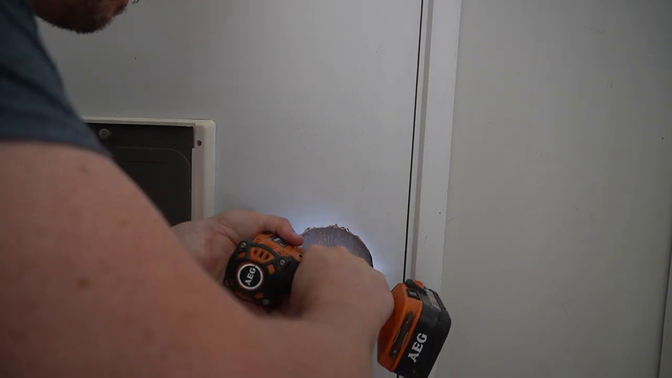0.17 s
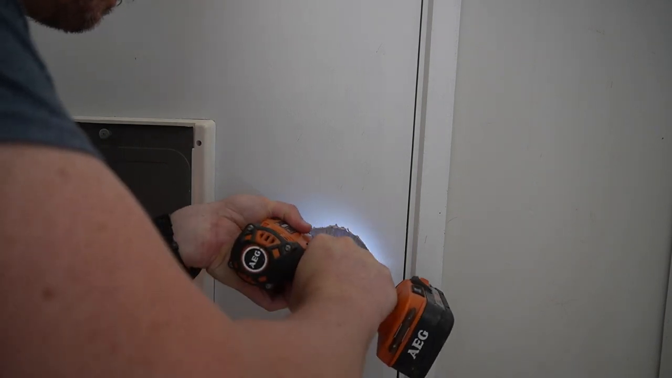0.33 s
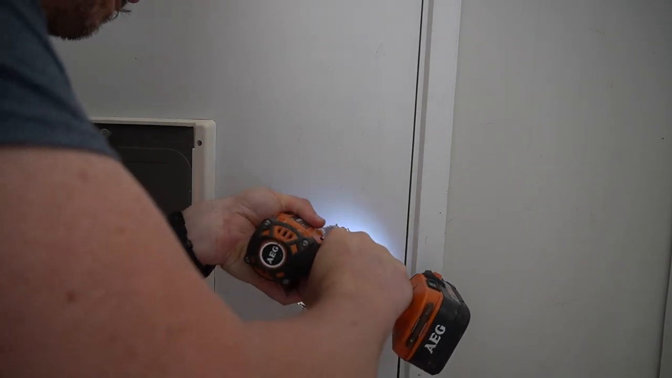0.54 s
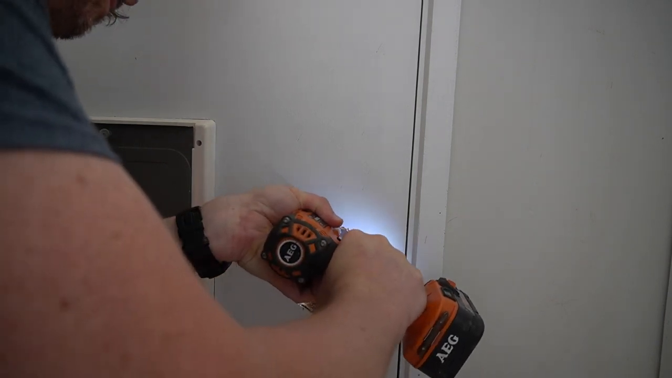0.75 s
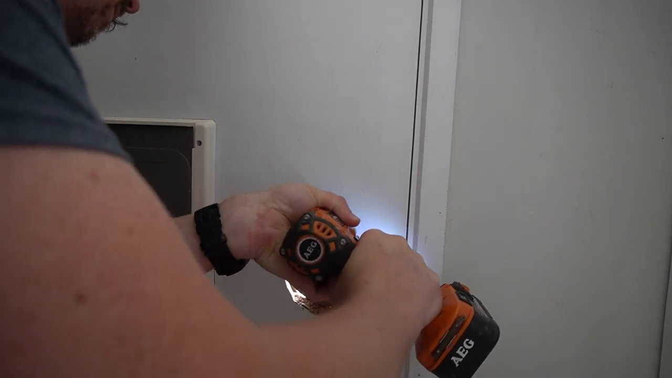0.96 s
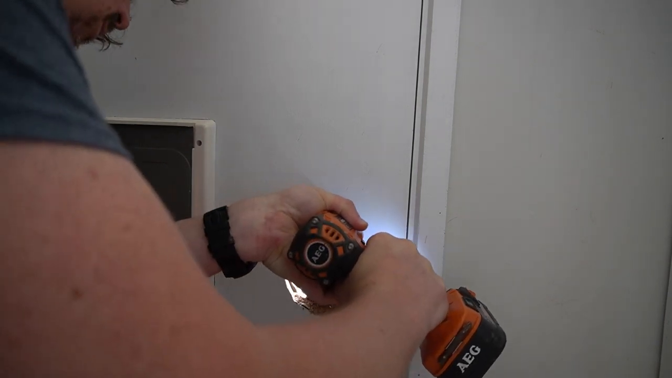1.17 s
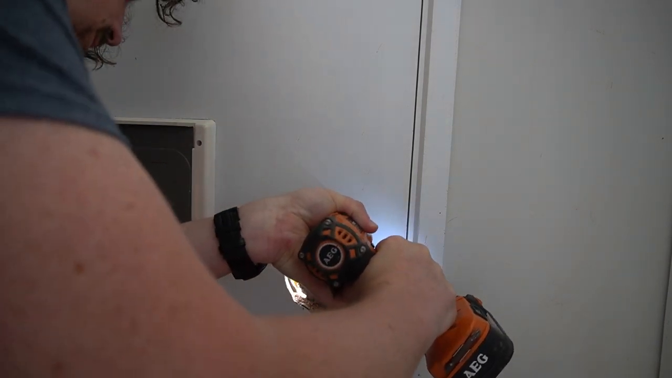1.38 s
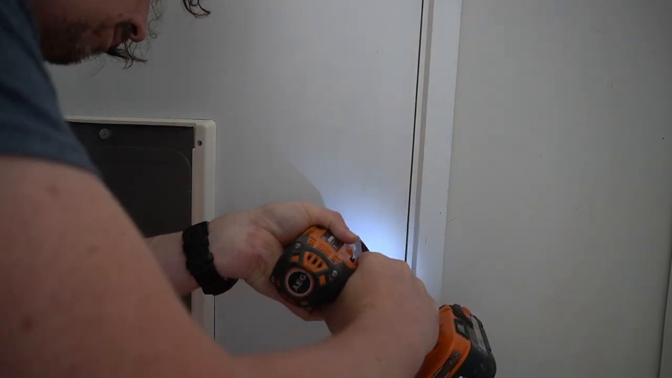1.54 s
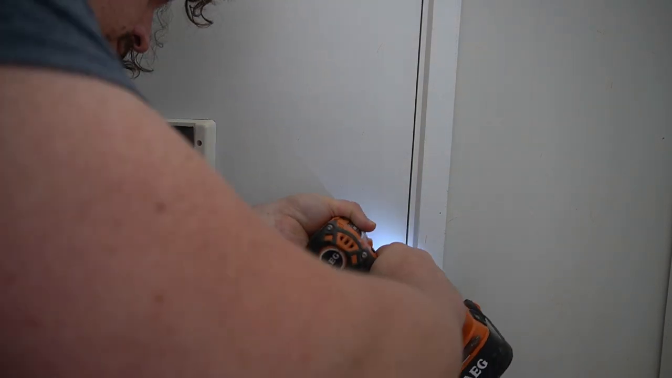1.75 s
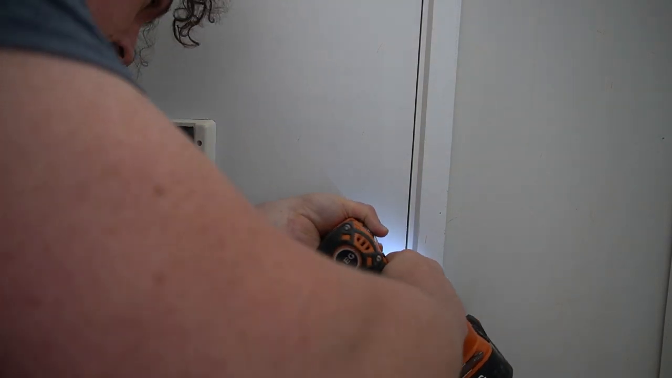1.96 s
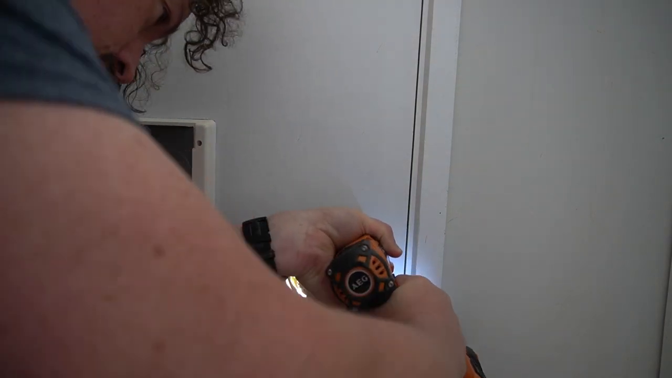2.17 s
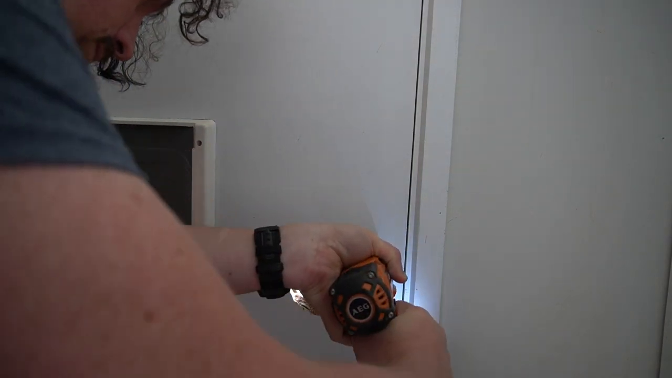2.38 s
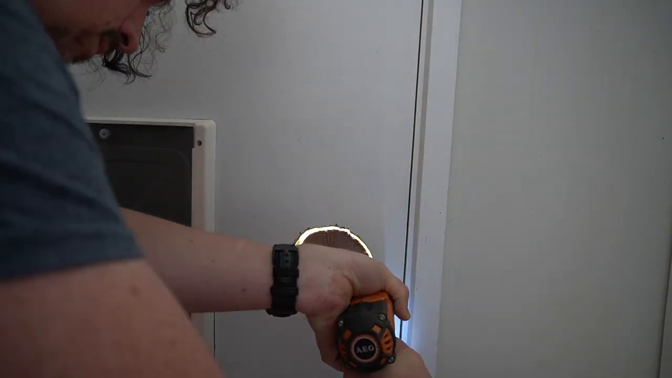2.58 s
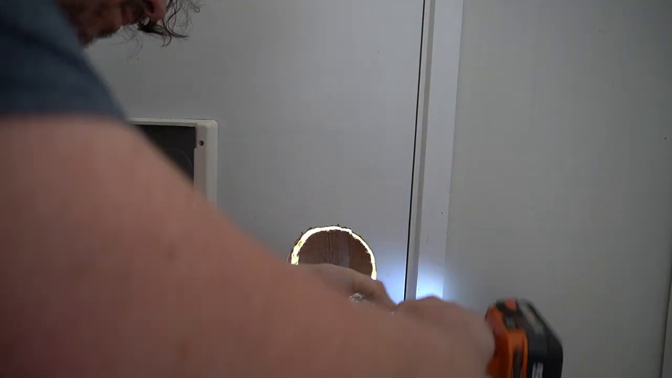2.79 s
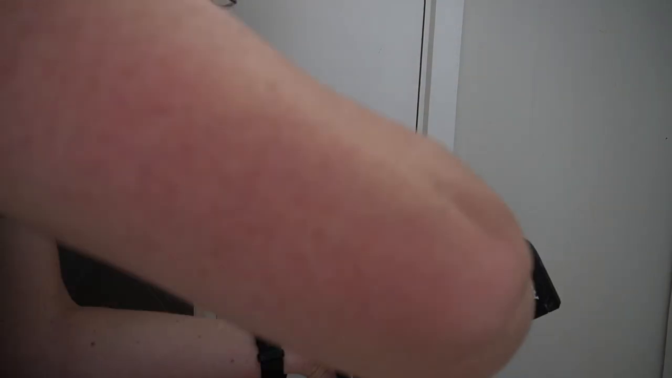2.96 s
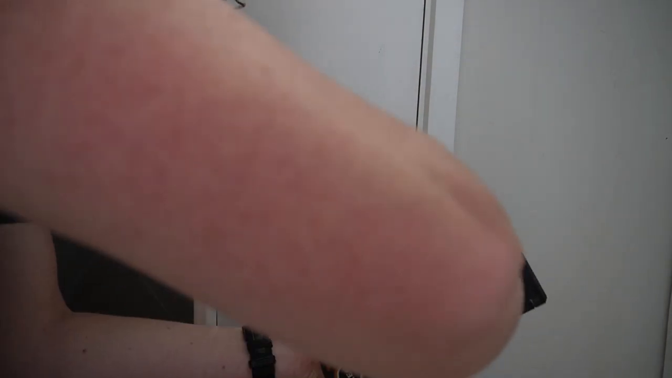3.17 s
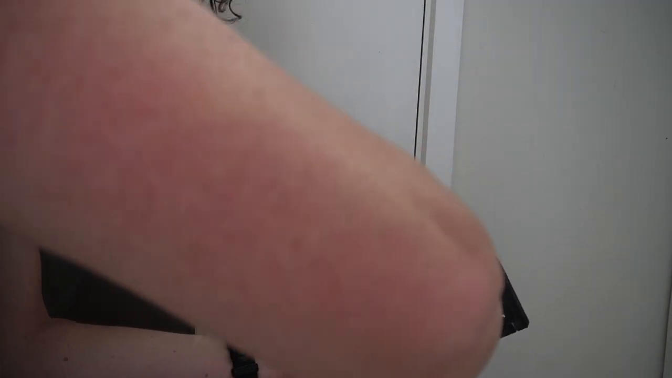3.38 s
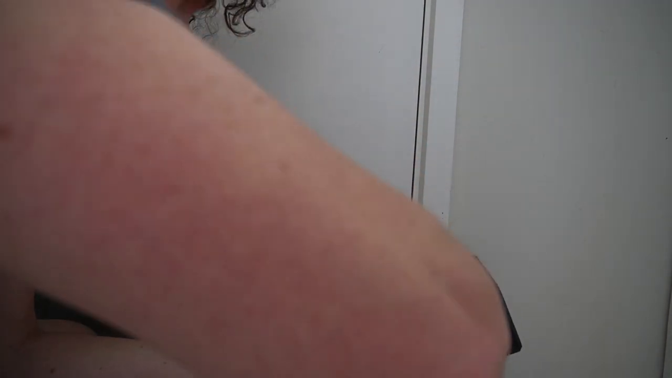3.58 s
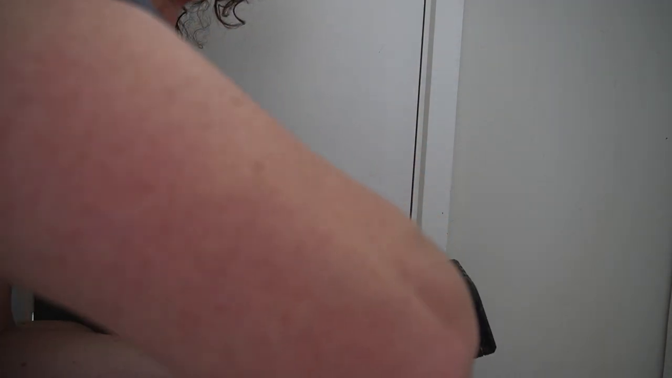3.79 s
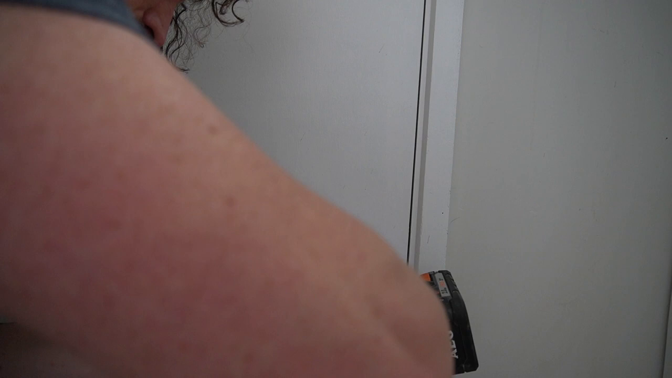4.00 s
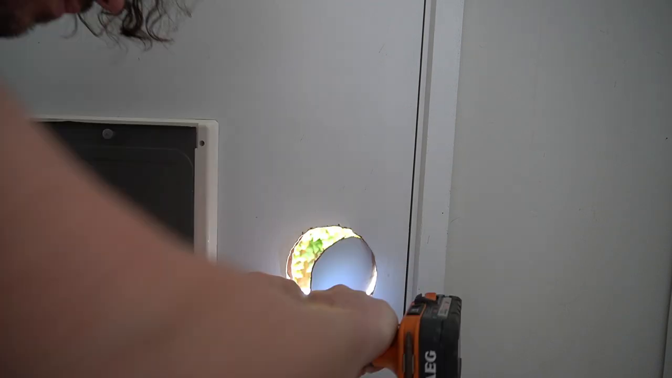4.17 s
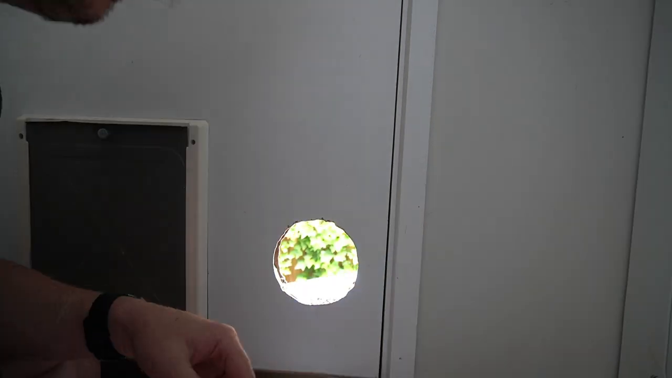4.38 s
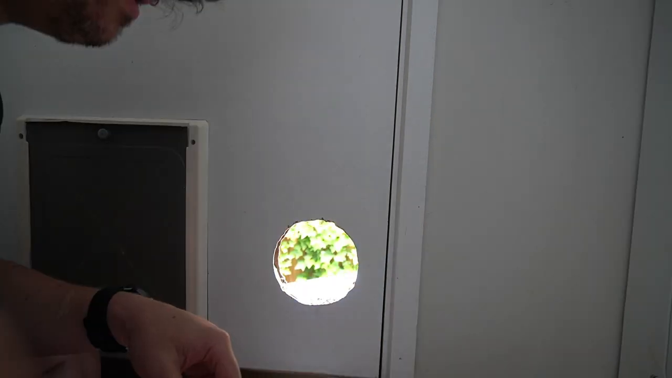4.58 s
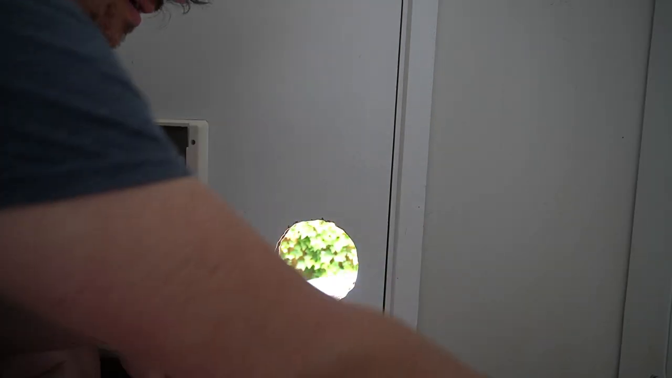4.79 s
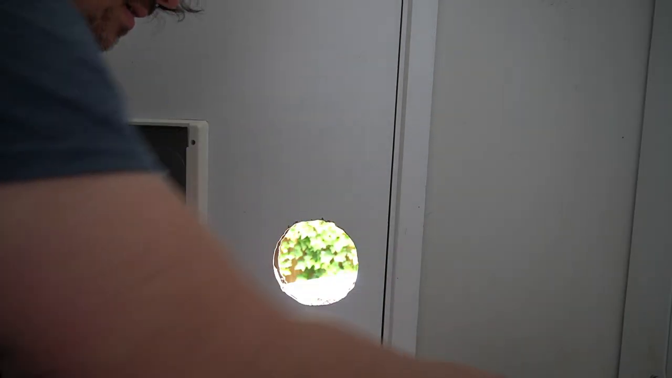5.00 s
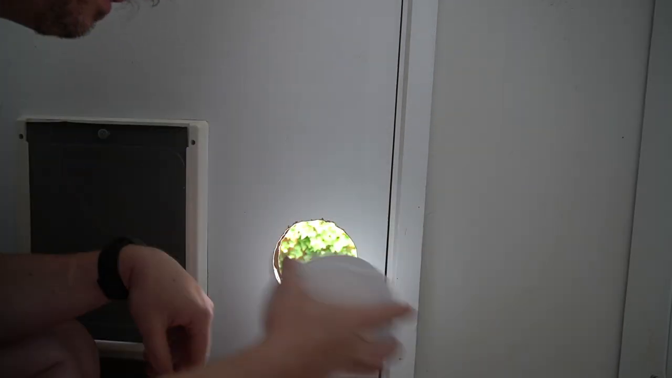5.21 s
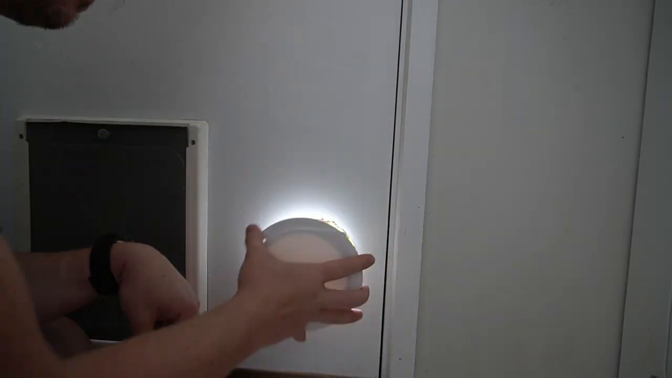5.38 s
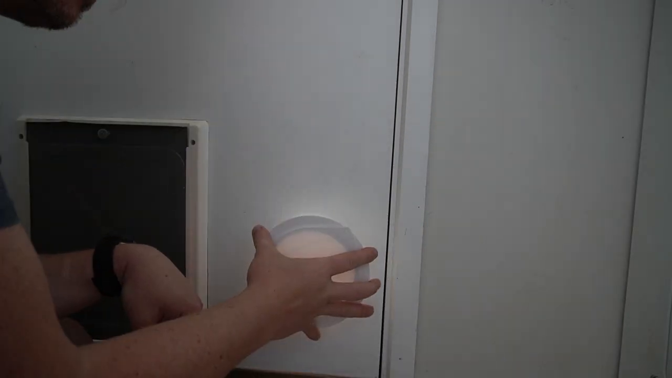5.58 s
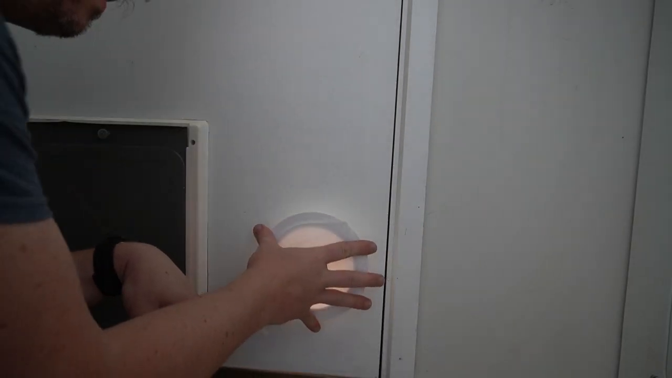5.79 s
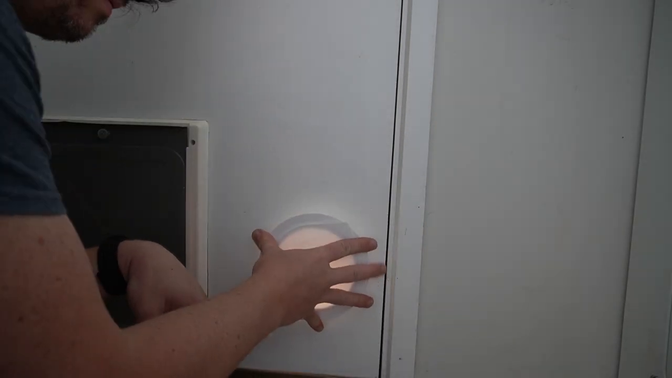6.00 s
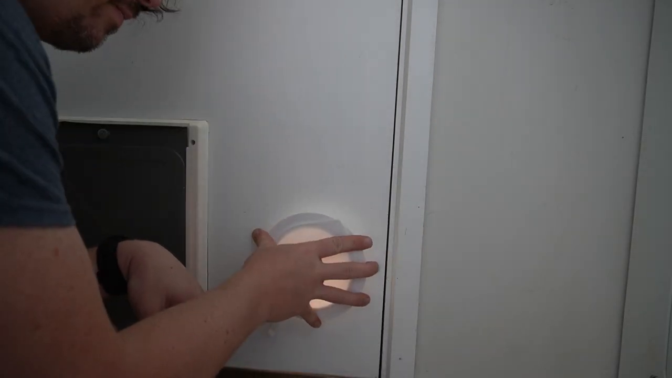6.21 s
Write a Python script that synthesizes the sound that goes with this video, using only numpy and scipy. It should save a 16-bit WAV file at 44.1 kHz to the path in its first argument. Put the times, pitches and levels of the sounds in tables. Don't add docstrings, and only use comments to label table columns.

```python
import sys
import numpy as np
from scipy import signal
from scipy.fft import rfft, irfft, next_fast_len
from scipy.io import wavfile
from scipy.ndimage import uniform_filter1d

SR = 44100
rng = np.random.default_rng(int(sys.argv[2]) if len(sys.argv) > 2 else 0)


def gain_from_db(level_db):
    decades = np.asarray(level_db, float) / 20
    return 10 ** decades


def transcribe(u):
    v = np.clip(np.atleast_2d(u).T, -1, 1)
    q = np.round(v * 32767).astype(np.int16)
    wavfile.write(sys.argv[1], SR, q)


N = 275625

# frequency in Hz, level in dB.
DOOR = [(115, -12), (161, -0.5), (280, -2.5), (382, -4.5), (517, -8), (657, 1.5), (732, 2), (840, -1),
        (969, -4), (1250, -18.5), (1604, -47)]


def evened(x):
    return x / np.sqrt(np.mean(x ** 2) + 1e-20)


def read(points, hz):
    f, value = np.transpose(points)
    return np.interp(np.log(hz + 1), np.log(f + 1), value)


def add(mix, s, sound):
    part = mix[max(round(s * SR), 0):][:len(sound)]
    part += sound[:len(part)]


def curves(rows):
    s, *columns = np.transpose(rows)
    t = np.arange(s[0], s[-1], 1 / SR)
    return t, [np.interp(t, s, c) for c in columns]


def lowpass(x, hz):
    return signal.lfilter(*signal.butter(N=2, Wn=2 * hz / SR), x)


def wander(size, hz):
    return evened(lowpass(rng.standard_normal(size + SR), hz)[SR:])


def coloured(x, points):
    size = next_fast_len(len(x))
    gain = gain_from_db(read(points, np.fft.rfftfreq(size, 1 / SR)))
    return evened(irfft(rfft(x, size) * gain, size)[:len(x)])


def grit(size, spread_db):
    grains = evened(uniform_filter1d(rng.standard_normal(size), size=40))
    return rng.standard_normal(size) * gain_from_db(spread_db * grains)


def resonate(x, hz, width):
    turn = np.exp(2j * np.pi * np.cumsum(hz * np.ones(len(x))) / SR)
    r = np.exp(-np.pi * width / SR)
    return 2 * (turn * signal.lfilter([1 - r], [1, -r], x / turn)).real


def peak(x, hz, width):
    return evened(resonate(resonate(x, hz, width), hz, width))


def faded(x, rise, fall):
    t = np.arange(len(x)) / SR
    return x * np.sin(np.pi / 2 * np.clip(np.minimum(t / rise, t[::-1] / fall), 0, 1)) ** 2


def drill(rows, speed, stance_db):
    # multiple of shaft speed, whine it follows (0-5), dB over it.
    orders = [(10.02, 0, -1), (20.02, 2, 0), (14.99, 1, 1), (30.0, 3, -2.5), (30.6, 5, -8), (39.96, 4, 2.5),
              (50.1, 5, -2), (11.0, 0, -9), (21.0, 2, -4), (19.0, 2, -9), (16.0, 1, -12), (33.0, 4, -6)]
    # mean in dB, swing in dB, loudest aim in degrees.
    lobes = [(-42.5, 5.5, 351), (-39.5, 4.5, 46), (-47.5, 1.5, 180), (-44.5, 8.5, 194), (-46.5, 1.5, 254),
             (-55, 4.5, 174)]
    # time in seconds, frequency in Hz.
    vent = [(0, 8200), (.9, 8500), (1.45, 9400), (1.7, 9000), (2.8, 8800), (2.9, 8500), (4.2, 8300)]
    # frequency in Hz, level in dB per Hz.
    cut_colour = [(1000, -39), (1300, -18.5), (1700, -20), (2200, -14), (2800, -9.5), (3500, -8),
                  (4300, -12.5), (5200, -11.5), (6000, -7.5), (9000, -10), (10500, -13), (12000, -19.5),
                  (13500, -21), (16000, -33)]
    # frequency in Hz, level in dB per Hz.
    rumble_colour = [(20, -25), (40, -13), (70, -6), (220, -13), (330, -13), (450, -9), (800, -10),
                     (1200, -11), (1600, -31), (2500, -55.5)]

    rise, fall = .024 * (rows[0][0] > 0), .024
    first, last = rows[0], rows[-1]
    held = [(first[0] - rise, *first[1:]), *rows, (last[0] + fall, *last[1:])]
    t, (cut_db, load, aim, shake_db) = curves(held)
    size = len(t)

    load = np.clip(load, .01, .99)
    boom_db = shake_db - 0.5 + 10 * np.log10(load)
    hum_db = shake_db - 1.5 + 10 * np.log10(1 - load)

    flutter = .0023 * wander(size, 14) + .0012 * wander(size, 60)
    shaft_hz = np.interp(t, *np.transpose(speed)) * (1 + flutter)
    turns = np.cumsum(shaft_hz) / SR
    whine_db = [db + swing_db * np.cos(np.radians(aim - facing)) for db, swing_db, facing in lobes]
    whine = np.zeros(size)
    for k, lead, db in orders:
        lead = int(lead)
        level_db = whine_db[lead] + stance_db[lead] + db + 3.5 + 2.6 * wander(size, 5)
        whine += gain_from_db(level_db) * np.cos(2 * np.pi * (k * turns + rng.random()))
    hum = gain_from_db(hum_db + 2.5) * (np.cos(2 * np.pi * turns) + 0.37 * np.cos(4 * np.pi * turns))

    bite = 1 + 0.11 * np.cos(2 * np.pi * turns)
    chips = grit(size, 1.0) * bite
    bright_hz = 7810 + 600 * load
    vent_hz = np.interp(t, *np.transpose(vent))
    hiss = coloured(chips, cut_colour) + 0.33 * peak(chips, bright_hz, 2700)
    hiss += 0.2 * peak(chips, vent_hz, 1300)
    hiss = gain_from_db(cut_db - 4.5 + 0.73 * wander(size, 14.5)) * evened(hiss)
    rumble_db = cut_db - 11 - 3.5 + 1.0 * wander(size, 9.1)
    rumble = gain_from_db(rumble_db) * coloured(grit(size, 1.1), rumble_colour)

    skin = rng.standard_normal(size)
    boom = gain_from_db(boom_db - 1.5) * evened(resonate(resonate(skin, 147.6, 44), 149.0, 44))
    boom += gain_from_db(-53.5 + 3.0 * (cut_db + 27.5)) * peak(skin, 290, 60)
    return t[0], faded(whine + hum + hiss + rumble + boom, rise + 1e-4, fall * 1.5)


def drill_bursts(mix):
    # time in seconds, cutting in dB, bite into the skin (0-1),
    # aim of the drill body in degrees, shaking of the door in dB.
    first = [(0.0, -25, 0.5, -3.5, -37.5), (0.208, -23.5, 0.6, -135.0, -43.6),
             (0.416, -27.0, 0.7, -186.0, -46.5), (0.624, -27.0, 0.6, -162.0, -49.5),
             (0.831, -27.5, 1, -195.0, -47.5), (1.039, -27.5, 0.64, -196.0, -42),
             (1.247, -26.5, 0.67, -190.0, -42), (1.455, -27, 0.72, -229.0, -40.5)]
    second = [(1.705, -27, 1.0, -200.0, -37.5), (1.86, -27, 0.99, -224.0, -37),
              (2.015, -27.5, 0.95, -236.0, -42), (2.17, -27.5, 0.06, -104.0, -44.9),
              (2.325, -27.1, 0.14, -252.0, -41), (2.48, -26.5, 0.05, -242.0, -42.5),
              (2.635, -28.5, 0.02, -206.0, -42.5), (2.79, -27.5, 0.03, -147.0, -43.5)]
    third = [(2.925, -27, 0.03, -250.0, -45.5), (3.106, -29, 0.059, -270.0, -46),
             (3.285, -27, 0.04, -264.0, -44.5), (3.467, -28, 0.89, -221.0, -49.5),
             (3.648, -26.5, 0.49, -102.0, -47), (3.829, -26, 0.6, -105.0, -51.5),
             (4.009, -27, 0.88, -73, -53), (4.188, -27.5, 0.62, -123.0, -49)]
    # time in seconds, speed in Hz.
    speeds = [
        [(0.0, 257), (0.06, 256.9), (0.1, 251.0), (0.57, 251.2), (0.702, 256.4), (0.884, 254.0), (1.142, 255.9),
         (1.2, 252.1), (1.45, 255.5)],
        [(1.72, 254), (1.78, 256), (1.904, 256.3), (1.954, 252.9), (2.402, 252.2), (2.512, 250.5), (2.67, 253),
         (2.79, 252.5)],
        [(2.93, 254.4), (3.168, 254.9), (3.2, 251.6), (3.56, 251), (3.8, 250), (4.154, 251.4), (4.19, 252)],
    ]
    stances = [
        (-2.5, -2, 0, -1, -1.5, 1),
        (1.5, -1.5, -1.5, -2.5, 0, -2),
        (-1, -2.5, -5, -3, -2, -6),
    ]
    for burst in zip((first, second, third), speeds, stances):
        add(mix, *drill(*burst))


def shuffles(mix):
    # time in seconds, level in dB.
    pauses = [
        [(1.47, -65.5), (1.56, -66), (1.6, -57), (1.67, -55), (1.69, -58)],
        [(2.8, -64), (2.83, -69), (2.9, -65)],
        [(4.2, -61), (4.25, -64), (4.29, -62), (4.33, -66), (4.368, -66)],
    ]
    # frequency in Hz, level in dB per Hz.
    brush = [(24, -35), (40, -18), (145, -1.5), (382, -17), (466, -18), (956, -14.5), (1820, -34),
             (8070, -34), (15000, -50)]
    for rows in pauses:
        t, (level_db,) = curves(rows)
        noise = coloured(rng.standard_normal(len(t)), brush)
        add(mix, t[0], gain_from_db(level_db + 4.5 * wander(len(t), 40)) * noise)


def snaps(mix):
    # time in seconds, level in dB, ring in Hz, spread in seconds, fizz over it in dB.
    clicks = [(1.512, -53.5, 600, .010, -5), (1.548, -59, 696, 0.0045, -1), (1.585, -53, 790, 0.0054, -6),
              (1.638, -44, 410, 0.0054, -12), (4.14, -29, 563, 0.006, -23), (4.28, -38, 700, 0.0032, -9),
              (4.28, -38, 2500, 0.003, -6), (4.327, -62, 6800, .008, -12), (4.3, -54, 910, 0.0077, -1),
              (4.3, -63, 7500, .004, -3), (4.356, -66, 6000, .004, -2), (4.452, -65, 7500, .008, -2)]
    # frequency in Hz, level in dB per Hz.
    fizz_colour = [(900, -1), (1500, -4), (5700, -6), (9000, -22), (12000, -32), (16000, -50)]
    t = np.arange(-2000, 2000) / SR
    for s, db, hz, spread, fizz_db in clicks:
        noise = rng.standard_normal(len(t))
        ring = np.cos(2 * np.pi * hz * t) + 0.53 * evened(resonate(noise, hz, 700))
        fizz = gain_from_db(fizz_db) * coloured(noise, fizz_colour)
        add(mix, s + t[0], gain_from_db(db) * np.exp(-abs(t) / spread) * (ring + fizz))


def room():
    # frequency in Hz, level in dB per Hz.
    tone = [(18, -55.5), (40, -16), (75, -9), (110, -14), (149, -3), (221, -18), (266, -10), (319, -22.5),
            (540, -22), (1500, -33), (4000, -38), (8000, -47), (16000, -60)]
    # time in seconds, rustle in dB, spread in seconds.
    stirs = [
        (4.42, -60, .015),
        (4.455, -53, 0.02),
        (4.74, -56, .012),
        (4.8, -48, 0.035),
        (5.25, -64, 0.096),
    ]
    t = np.arange(4.37, N / SR, 1 / SR)
    stir = sum(gain_from_db(db) * np.exp(-abs(t - s) / spread) for s, db, spread in stirs)
    settling = gain_from_db(-48.5) * np.exp(-((t - t[0]) / 0.21) ** 2)
    rumble = gain_from_db(-53) + settling + 0.5 * stir
    rustle = gain_from_db(-64.5) + stir
    noise = coloured(rng.standard_normal(len(t)), tone)
    low = lowpass(noise, 1200)
    hum = gain_from_db(-54 + 2.0 * wander(len(t), 3.6)) * np.cos(2 * np.pi * 150 * t)
    hiss = gain_from_db(-64) * coloured(rng.standard_normal(len(t)), [(500, 2), (8000, -14), (16000, -20)])
    return t[0], rumble * low + rustle * evened(noise - low) + hum + hiss


def sways_and_rings(mix):
    # start in seconds, level in dB, Hz, t60 in seconds.
    sways = [
        (5.458, -27, 120, .2),
        (5.49, -33, 75, .3),
        (5.605, -24, 285, .1),
        (5.727, -21, 125, .16),
        (5.765, -28, 110, .2),
        (5.968, -26, 120, .2),
        (6.02, -32, 70, .3),
    ]
    # start in
    # seconds, level in dB, Hz, t60 in seconds.
    rings = [(4.722, -33, 450, .1), (4.75, -37, 330, .09), (4.755, -39, 510, .1), (4.77, -39, 800, .06),
             (4.772, -28, 485, .1), (4.792, -23, 415, .07), (4.788, -25, 305, .1), (4.805, -30, 490, .2),
             (4.832, -31, 470, .12), (4.835, -35, 545, .12), (4.89, -36, 435, .12), (4.805, -38, 1085, .1),
             (4.45, -67, 6600, .3), (5.563, -22, 690, .08), (5.62, -34, 655, .45), (5.715, -27, 930, .08),
             (5.63, -38, 1000, .2)]
    t = np.arange(SR // 2) / SR
    for s, db, hz, t60 in sways + rings:
        add(mix, s, gain_from_db(db - 60 * t / t60) * np.minimum(t / .006, 1) * np.sin(2 * np.pi * hz * t))


def hit(row, modes, ring_s, colour, scatter):
    s, tick_db, knock_db, tick_hz, thump_db = row
    softness_db = knock_db - tick_db
    t60 = ring_s * gain_from_db(.25 * max(softness_db, 0))
    t = np.arange(SR // 3) / SR

    crack = rng.standard_normal(len(t))
    tick = evened(coloured(crack, colour) + 0.4 * peak(crack, tick_hz, 2200))
    tick = tick * np.exp(-t / 0.0024) * np.minimum(t / 0.00067, 1)
    tick += gain_from_db(-20.5 - 60 * t / .3) * np.minimum(t / .004, 1) * coloured(crack[::-1], scatter)

    hz, db = np.transpose(modes)[:, :, None]
    strength, pitch = rng.random((2, len(modes), 1))
    low = hz[:, 0] < 400
    fade_db = -60 * t / np.where(hz < 400, .12, t60 * 600 / hz)
    dull_db = .15 * softness_db * np.log2(hz / 600)
    swing = np.sin(2 * np.pi * hz * (.96 + .08 * pitch) * t)
    rings = gain_from_db(db + 7.5 * strength + fade_db - dull_db) * swing
    knock = rings[~low].sum(0) * np.minimum(t / 0.0017, 1)
    thump = rings[low].sum(0) * np.minimum(t / 0.0058, 1)
    knock = gain_from_db(knock_db) * knock / abs(knock).max()
    thump = gain_from_db(thump_db) * thump / abs(thump).max()
    return s, gain_from_db(tick_db) * tick + knock + thump


def tool_set_down(paths):
    # start in seconds, tick in dB, knock in dB, tick in Hz, thump in dB.
    blows = [
        (4.7241, -58, -34, 3750, -44),
        (4.735, -47, -45, 2800, -55),
        (4.752, -55, -36, 2600, -40),
        (4.775, -38, -29, 3700, -36),
        (4.7952, -26, -17, 3900, -23),
        (4.8114, -45, -29, 1600, -48),
        (4.828, -50, -32, 1600, -48),
        (4.855, -56, -36, 1600, -42),
        (4.886, -56, -35, 1600, -48),
    ]
    # frequency in Hz, level in dB.
    modes = [(161, -17), (310, -6), (420, -6), (479, -1), (544, -4), (608, -16), (800, -16), (1082, -9),
             (1250, -10), (1500, -13), (1793, -14)]
    # frequency in Hz, level in dB per Hz.
    tick_colour = [(700, -12), (1500, -1), (4000, 0), (6000, -7), (11000, -15), (13000, -28), (16000, -36)]
    # frequency in Hz, level in dB per Hz.
    scatter = [(900, -15), (1500, -7), (2500, -9), (4000, 0), (5500, -8), (9000, -20), (16000, -36)]
    for k, row in enumerate(blows):
        add(paths[k % len(paths)], *hit(row, modes, 0.06, tick_colour, scatter))


def fitting_knocks(paths):
    # start in seconds, tick in dB, knock in dB, tick in Hz, thump in dB.
    blows = [(5.145, -52, -54, 3200, -64), (5.2028, -54, -56, 3600, -61), (5.4458, -43.5, -26.5, 2500, -28),
             (5.523, -48.5, -42, 4500, -34), (5.549, -52, -55, 4500, -55), (5.5623, -28, -14, 3950, -20),
             (5.569, -34, -15, 3500, -30), (5.59, -36, -18, 3500, -26.5), (5.6071, -40, -21, 1600, -25),
             (5.7176, -22, -15, 3200, -20.5), (5.7855, -21, -30.5, 6000, -36),
             (5.751, -34.5, -45, 9000, -47), (5.884, -39, -49, 5000, -55), (5.801, -30, -31, 2980, -39),
             (5.961, -16.5, -18.5, 7030, -22.5), (6.0292, -23, -26.5, 2580, -36),
             (6.0745, -42, -30, 3600, -36.5), (6.082, -42, -45, 9000, -50), (5.9292, -42, -45, 2040, -50),
             (5.9406, -42, -48, 4800, -55), (6.227, -36, -26, 3000, -35), (6.0922, -23, -21, 4300, -28.5),
             (6.096, -13.5, -11.5, 3750, -17.5), (6.123, -17, -12, 2620, -22.5),
             (6.1419, -18.5, -13.5, 3030, -28), (6.239, -31, -20, 2600, -22)]
    # frequency in Hz, level in dB per Hz.
    tick_colour = [(700, -25), (1500, -2), (4000, 1), (8000, -3), (11000, -9), (16000, -25)]
    # frequency in Hz, level in dB per Hz.
    scatter = [(900, -20), (1800, 0), (4000, -1), (8000, -6), (12000, -14), (16000, -25)]
    for k, row in enumerate(blows):
        add(paths[k % len(paths)], *hit(row, DOOR, 0.043, tick_colour, scatter))


def echoes(x):
    # frequency in Hz, level in dB.
    walls = [(300, .1), (1500, -2), (2500, -14), (5000, -30)]
    # frequency in Hz, t60 in seconds.
    decay = [(100, 0.28), (700, 0.38), (3000, 0.36), (8000, .3), (14000, 0.22)]
    hz, t, z = signal.stft(rng.standard_normal(SR // 2), SR, nperseg=256)
    level_db = read(walls, hz)[:, None] - 60 * t / read(decay, hz)[:, None]
    tail = signal.istft(z * gain_from_db(level_db), SR, nperseg=256)[1]
    delay = np.zeros(150)
    return signal.fftconvolve(x, np.r_[delay, tail / np.linalg.norm(tail)])[:N]


def scrape():
    # start in seconds, rise in seconds, body in dB,
    # thump over body in dB, rasp over body in dB.
    pushes = [(5.446, .005, -51, 3, -13), (5.53, .03, -60, 0, 1), (5.562, 0.012, -37, 0.5, -1),
              (5.6, .04, -50, -16, 8), (5.64, .06, -41, -14, -4), (5.718, .012, -42, 9, -2),
              (5.79, .01, -50, 0, 4), (5.87, .07, -49, 2, 6), (5.955, .015, -40, 7, 0),
              (6.03, .04, -51, 4, 6), (6.09, .05, -32, -2, -12), (6.14, .05, -29.5, 2, -4),
              (6.2, .05, -28, 7, -1.5)]
    # frequency in Hz, level in dB per Hz.
    rim = [(900, -4), (1500, -3), (3000, -4), (5700, -10), (9000, -19), (12000, -25), (14000, -29),
           (16000, -34)]
    let_go = (-95, -120, -90)
    t = np.arange(pushes[0][0], N / SR, 1 / SR)
    s, rise, body_db, thump_db, rasp_db = np.transpose(pushes)[:, :, None]
    swell = np.clip((t - s) / rise, 0, 1) ** 2
    after = np.maximum(t - s - rise, 0)
    low, mid, high = (np.linalg.norm(swell * gain_from_db(body_db + db + fall_db * after), axis=0)
                      for db, fall_db in zip((thump_db, 0, rasp_db), let_go))
    rub = grit(len(t), 2.1)
    dull = lowpass(rub, 3500)
    thump = evened(sum(gain_from_db(db) * resonate(dull, hz, 40) for hz, db in DOOR if hz < 400))
    body = evened(sum(gain_from_db(db) * resonate(dull, hz, 70) for hz, db in DOOR if hz > 400))
    return t[0], low * thump + mid * body + high * coloured(rub, rim)


def squeak():
    # time in seconds, level in dB, pitch in Hz.
    slide = [
        (5.693, -60, 5840),
        (5.704, -44, 6320),
        (5.716, -48, 6600),
    ]
    t, (db, hz) = curves(slide)
    return t[0], gain_from_db(db) * peak(rng.standard_normal(len(t)), hz, 250)


def scene():
    mix, paths = np.zeros(N), np.zeros((3, N))
    for source in (drill_bursts, shuffles, snaps, sways_and_rings):
        source(mix)
    for source in (room, scrape, squeak):
        add(mix, *source())
    tool_set_down(paths)
    fitting_knocks(paths)
    mix += sum(path + gain_from_db(-13) * echoes(path) for path in paths)
    return np.tile(mix, (2, 1))


def phase_slip(x):
    # start in seconds, end in seconds, border
    # at start in Hz, border at end in Hz, turn in half turns.
    first = [(.82, 1.0, 2900, 2900, 0.75), (.82, 1.0, 3200, 3200, 0.0021), (.9, 1.5, 10300, 9500, .32),
             (1.511, 1.58, 9100, 9100, 1), (1.58, 1.65, 8200, 8200, .3)]
    second = [(1.596, 2.0, 2950, 3640, 0.87), (2.0, 2.4, 3700, 2870, 0.83), (2.4, 2.6, 3200, 3000, 0.85),
              (1.63, 1.76, 2800, 2700, 0.98), (1.63, 1.73, 3000, 3900, .8), (1.73, 1.87, 3300, 4150, 1),
              (1.93, 2.22, 4100, 3900, 1), (2.34, 2.52, 3875, 4100, 0.96), (2.6, 2.79, 3000, 3100, 0.99),
              (2.52, 2.8, 3700, 3660, 0.83), (1.55, 2.5, 4740, 4630, 0.57), (2.5, 2.5, 4700, 3780, .5),
              (1.55, 1.9, 5600, 5800, -0.094), (2.08, 2.36, 5400, 5300, 0), (2.36, 2.7, 5400, 5600, .93),
              (2.5, 2.87, 5500, 4750, .98), (2.36, 2.55, 6100, 6350, 0), (1.62, 2.2, 7100, 6850, -.64),
              (2.2, 3, 6900, 6250, -0.72), (2.56, 2.87, 6300, 5500, -0.65), (1.8, 2.1, 8150, 9500, -.44),
              (2.4, 2.87, 8300, 7500, -0.88), (2.2, 2.87, 9150, 8400, -0.32)]
    third = [(2.88, 3.0, -50, -50, 0.97), (2.88, 3.0, 250, 129, 0), (2.95, 3.05, 1700, 1900, .84),
             (3.05, 3.27, 1750, 1900, .74), (2.93, 3.05, 2150, 2100, 1), (3.1, 3.14, 2000, 2000, 1),
             (3.18, 3.27, 2300, 2000, 1), (3.27, 3.5, 1080, 400, 1), (3.5, 3.73, 420, 380, 1),
             (3.73, 3.76, 330, 100, 1), (3.76, 4.285, -500, -500, 1), (4.23, 4.26, 200, 200, .1),
             (4.23, 4.26, 550, 550, .9), (4.22, 4.27, 1800, 1800, .3), (4.22, 4.27, 3300, 3000, 1),
             (4.24, 4.27, 3800, 3700, .1), (2.88, 3.38, 2648, 3050, 0.098),
             (2.88, 3.38, 3699.5, 3300.5, -0.74), (3.38, 3.5, 2950, 3450, -0.75),
             (3.5, 3.78, 3400, 3550, -0.73), (3.78, 4.24, 3780, 3850, -.73), (2.9, 3.27, 4750, 4350, 0.63),
             (2.9, 3.27, 5350, 5203, -0.77), (2.88, 2.98, 5500, 5500, 0.69), (3.3, 4.0, 4300, 4200, .8),
             (2.98, 3.5, 5700, 5500, .8), (3.02, 3.5, 6350, 6300, .9), (3.5, 4.0, 5500, 5300, .8),
             (3.92, 4.3, 5200, 5300, .86), (4.0, 4.3, 5600, 5600, .75), (4.0, 4.1, 6400, 6400, .97),
             (2.98, 4.08, 7000, 6601, 0.75), (4.08, 4.3, 6900, 6000, 0.72), (3.3, 4.08, 8450, 7500, .45),
             (4.08, 4.3, 7700, 6600, 0.44), (2.9, 3.42, 8500, 8000, -0.17), (2.5, 3.7, 9201, 8150, 0.48),
             (4.26, 4.36, 900, 300, 0.63)]
    hz, t, z = signal.stft(x, SR, nperseg=2048, noverlap=1536)
    slip = np.zeros(z.shape)
    for start, end, from_hz, to_hz, half_turns in first + second + third:
        jitter = evened(uniform_filter1d(rng.standard_normal(len(t)), size=4))
        border = np.interp(t, [start, end], [from_hz, to_hz])
        border = border + 90 * np.clip(from_hz / 3000, 0, 1) * jitter
        slip = np.where((t >= start) & (t <= end) & (hz[:, None] > border), half_turns, slip)
    wobble = uniform_filter1d(rng.standard_normal(z.shape[::-1]).T, size=10, axis=0)
    wobble = evened(uniform_filter1d(wobble, size=5, axis=1))
    slip = np.clip(slip + .13 * np.sin(np.pi * slip) * wobble, -1, 1)
    slip = np.where(abs(slip) > .92, np.sign(slip), slip)
    return signal.istft(z * np.exp(-1j * np.pi * slip), SR, nperseg=2048, noverlap=1536)[1][:N]


def roll_off(x):
    return signal.sosfilt(signal.butter(12, 16000, fs=SR, output="sos"), x)


def record(dry):
    dry = .4 * np.tanh(dry / .4)
    dry = signal.oaconvolve(dry, signal.firwin(255, 16050, fs=SR)[None], "same")
    return roll_off(np.array([dry[0], phase_slip(dry[1])]))


dry = scene()
out = record(dry)
transcribe(out)
```